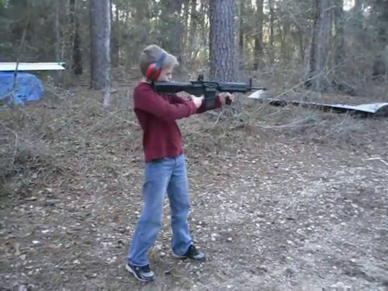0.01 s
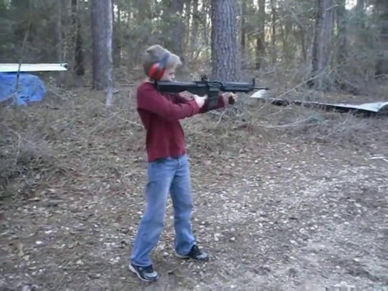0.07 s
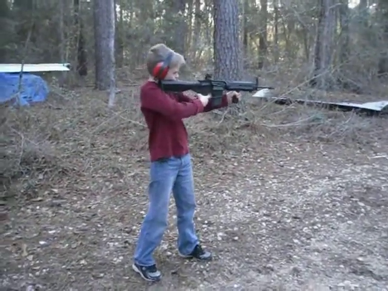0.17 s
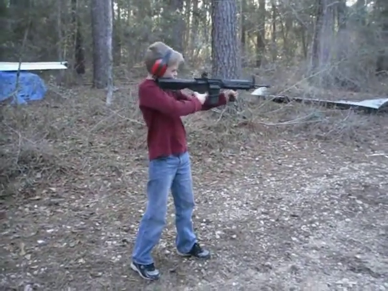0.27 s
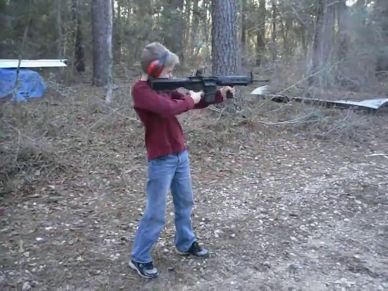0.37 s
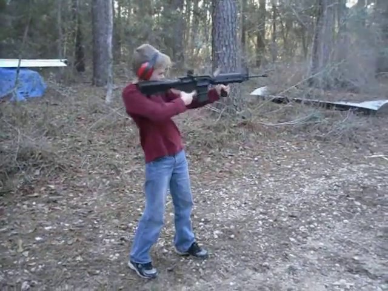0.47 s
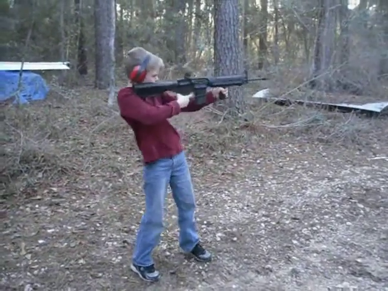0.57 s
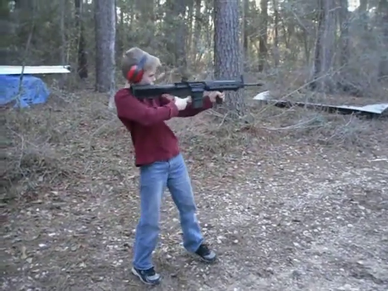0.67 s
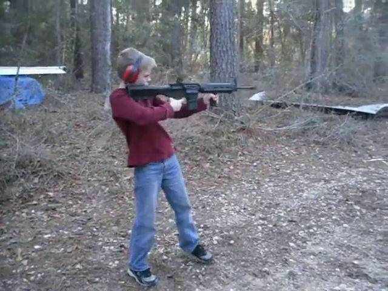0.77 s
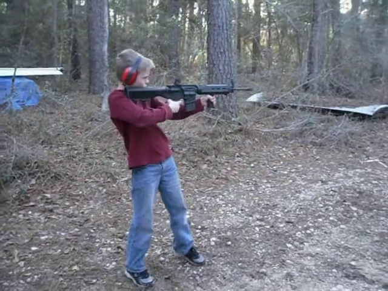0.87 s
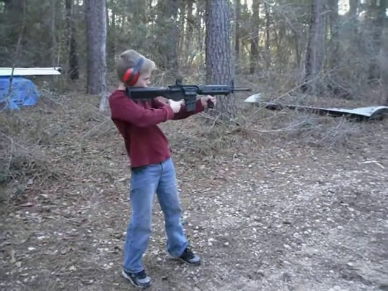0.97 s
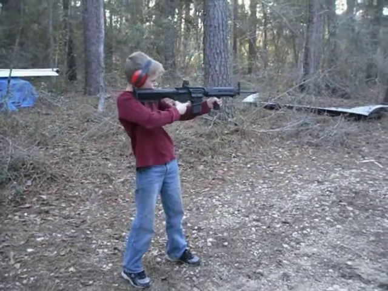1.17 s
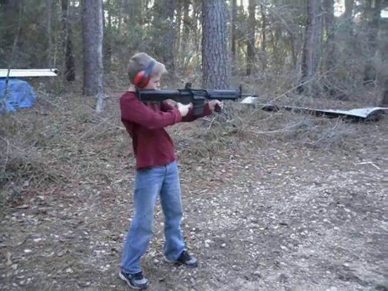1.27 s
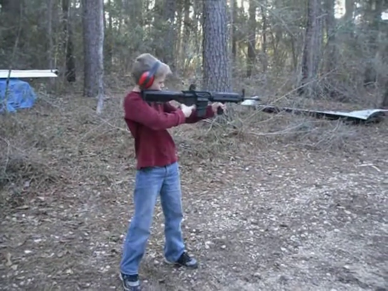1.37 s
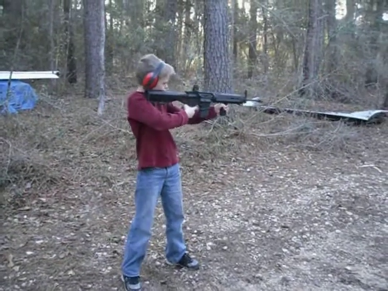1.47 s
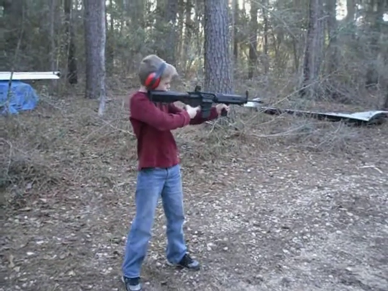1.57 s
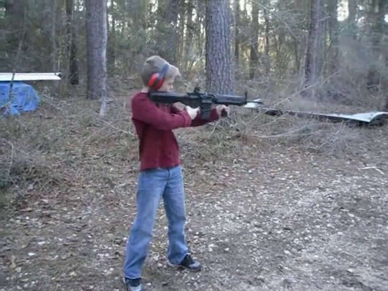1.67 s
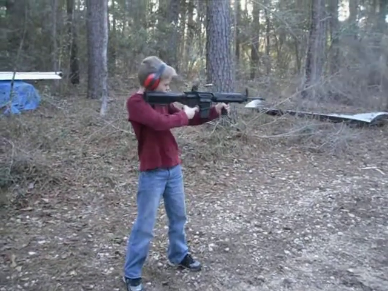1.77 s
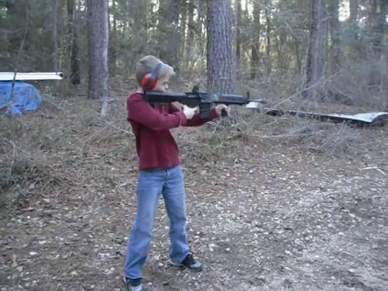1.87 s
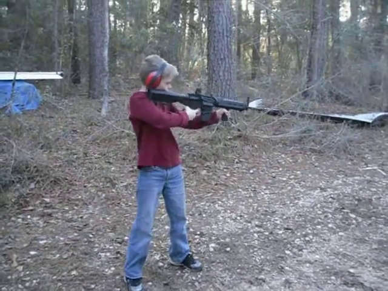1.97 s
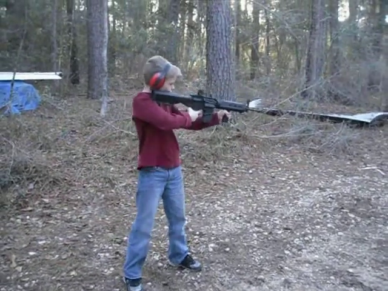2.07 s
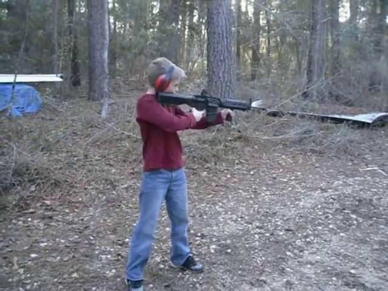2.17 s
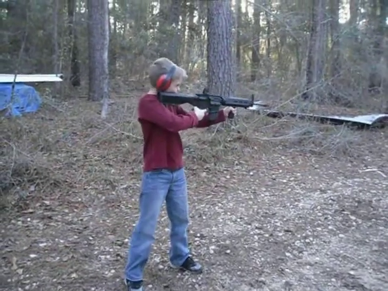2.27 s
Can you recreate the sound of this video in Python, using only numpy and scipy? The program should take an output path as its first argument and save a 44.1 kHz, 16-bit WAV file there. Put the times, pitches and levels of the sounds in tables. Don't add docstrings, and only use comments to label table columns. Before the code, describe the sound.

Rifle fires a rapid burst of three, then two, with rolling echoes through woods

```python
import sys
import numpy as np
from scipy import signal
from scipy.fft import rfft, irfft, next_fast_len
from scipy.io import wavfile
from scipy.ndimage import uniform_filter1d, map_coordinates

SR = 44100
rng = np.random.default_rng(int(sys.argv[2]) if len(sys.argv) > 2 else 0)


def gain_from_db(level_db):
    decades = np.asarray(level_db, float) / 20
    return 10 ** decades


def int16_out(signal):
    q = np.round(np.clip(np.atleast_2d(signal).T, -1, 1) * 32767)
    wavfile.write(sys.argv[1], SR, q.astype(np.int16))


N = 101430

# [t/s, level/dB]
SHOTS = [
    (0.2165, -1),
    (0.308, 1),
    (.3982, 0),
    (1.5995, -0.5),
    (1.6853, -3),
]
EARLIER_S, EARLIER_DB = -1.26, 10

# [f/Hz, density/dB per Hz]
NEAR_SPECTRUM = [(40, -30), (160, 3), (450, 3.5), (880, -0.5), (1250, -9), (3200, -13.5), (4200, -15.5),
                 (8000, -19)]
FAR_SPECTRUM = [(40, -51), (150, -23.5), (400, -7.5), (740, -1), (1100, -12), (1800, -12.5), (3400, -17),
                (7500, -29)]
GROUND_SPECTRUM = [(30, -40), (55, -0.5), (105, 5.5), (140, -8.5), (300, -61.5)]
# [f/Hz, T60/s]
NEAR_T60_S = [(60, 0.52), (200, 0.3), (700, 0.61), (2500, 0.64), (7000, 0.48)]
FAR_T60_S = [(60, 2.7), (200, 2.54), (700, 2.76), (1500, 2.29), (3200, 1.563), (4500, 1.16), (7000, 1.07)]
GROUND_T60_S = [(60, 0.81), (120, 1.29)]
NEAR_DB, FAR_DB, GROUND_DB = 10, -10.5, -25.5
NEAR_RISE_S, FAR_RISE_S, GROUND_RISE_S = 0.0061, 0.078, 0.2
# [rate/per s, depth/dB]
LUMPS = [(10, -0.5), (60, 1.27), (160, 2), (500, 1)]
LUMPY_BELOW_HZ, SMOOTH_SHARE = 1300, 0.23
PATCHY_DB = 1.0

# [f/Hz, density/dB per Hz]
AIR_SPECTRUM = [(25, -8), (60, 1), (110, -2), (150, -8), (350, -11), (1000, -14), (4000, -22.5),
                (8000, -28)]
AIR_DB = -53.5

# [t/s, level/dB]
CASES = [
    (0.127, -43),
    (1.0494, -49.5),
    (1.0919, -40),
    (1.2634, -39),
]
# [f/Hz, density/dB per Hz]
BRASS_SPECTRUM = [(1500, -32), (3000, -10), (5000, 5.5), (7000, 4), (9000, -22)]
CASE_T60_S, CASE_RISE_S, CASE_DB = 0.049, 0.00089, -9

HAMMER_LEAD_S, HAMMER_DB, HAMMER_T60_S = 0.0083, -32, 0.035
# [t after blast/s, level/dB]
BOLT = [
    (0.0126, 11.5),
    (.021, 11),
    (0.031, 3.5),
    (.048, 5),
    (.065, 0.5),
]
# [f/Hz, density/dB per Hz]
STEEL_SPECTRUM = [(1500, -31), (3000, 1.5), (4500, -13.5), (6800, 0), (9000, -6.5)]
BOLT_T60_S, BOLT_SCATTER_DB = 0.016, 2

PULSE_S, PULSE_LAG_S, PULSE_DB = 0.0016, 0.0016, 14
# [f/Hz, density/dB per Hz]
JET_SPECTRUM = [(300, -23.5), (1200, -6), (2200, -3), (2900, 0), (3800, -2), (6300, -4), (9000, -5)]
JET_DB, JET_RISE_S, JET_T60_S = 26, 0.0025, 0.022

# [t/s, level/dB]
RATTLE = [
    (.511, 5.5),
    (.545, -7),
    (1.74, -7.5),
]
# [f/Hz, density/dB per Hz]
FRAME_SPECTRUM = [(1800, -30.5), (2600, -5.5), (3100, 4.5), (3700, -17), (5000, -32)]
RATTLE_T60_S, RATTLE_RISE_S = 0.033, 0.002

# [t/s, level/dB]
BIG_TRUNKS = [
    (.535, 3.5),
    (.59, 3.5),
    (.601, -7),
    (.622, -8.5),
    (.65, -10.5),
    (1.82, -2.5),
    (1.843, -2),
    (1.925, -5),
    (2.003, -7),
]
BIG_HZ, BIG_T60_S, BIG_RISE_S = 724, 0.029, 0.0025

# [f/Hz, gain/dB]
CAPSULE = [(20, -26), (55, 0), (3500, -0.5), (4200, -5), (7300, 0), (8800, -13), (9500, -46.5)]
# [f/Hz, gain/dB]
ANTI_ALIAS = [(7200, -0.5), (8000, -6), (8900, -14), (9600, -19.5), (16000, -36.5)]
INPUT_TOP, INPUT_KNEE, OUTPUT_TOP, OUTPUT_KNEE = 0.82, 10, 0.73, 39
TOP_HZ, TOP_WIDTH_HZ, DC_OFFSET = 15950, 60, 0.0015


def unit(x):
    return x / np.sqrt(np.mean(x ** 2) + 1e-20)


def along(points, hz):
    f, v = np.transpose(points)
    return np.interp(np.log(hz + 1), np.log(f + 1), v)


def filtered(x, response):
    m = 2 * next_fast_len(len(x) // 2 + 4096)
    return irfft(rfft(x, m) * response(np.fft.rfftfreq(m, 1 / SR)), m)[:len(x)]


def noise(spectrum):
    white = rng.standard_normal(N)
    return unit(filtered(white, lambda hz: gain_from_db(along(spectrum, hz))))


def wobble(rate_per_s):
    knots = rng.standard_normal(3000)
    return map_coordinates(knots, [np.arange(N) * rate_per_s / SR])


def burst(start_s, db, t60_s, rise_s=0.0009):
    t = np.maximum(np.arange(N) / SR - start_s, 0)
    return gain_from_db(db - 60 * t / t60_s) * (1 - np.exp(-(t / rise_s) ** 3))


def lumpy_noise():
    lumps_db = sum(depth_db * wobble(rate) for rate, depth_db in LUMPS)
    white = rng.standard_normal(N)

    def low(hz):
        return 1 / (1 + (hz / LUMPY_BELOW_HZ) ** 4)

    deep = unit(white * gain_from_db(lumps_db))
    shallow = unit(white * gain_from_db(SMOOTH_SHARE * lumps_db))
    return filtered(deep, low) + filtered(shallow, lambda hz: 1 - low(hz))


def echoes(spectrum, t60s, db, rise_s):
    coloured = unit(filtered(lumpy_noise(), lambda hz: gain_from_db(along(spectrum, hz))))
    hz, t, z = signal.stft(coloured, SR, nperseg=512)
    patches = uniform_filter1d(rng.standard_normal(z.shape), size=5, axis=0)
    patches = uniform_filter1d(patches, size=4, axis=1)
    z = z * gain_from_db(PATCHY_DB * unit(patches))
    t60_s = along(t60s, hz)[:, None]
    out = np.zeros(N)
    for s, strength_db in [*SHOTS, (EARLIER_S, EARLIER_DB)]:
        decay = gain_from_db(-60 * np.maximum(t - s, 0) / t60_s)
        shifted = np.roll(z, rng.integers(z.shape[1]), axis=1)
        tail = signal.istft(shifted * decay, SR, nperseg=512)[1][:N]
        out += tail * burst(s, strength_db + db, np.inf, rise_s)
    return out


def wood_roll():
    near = echoes(NEAR_SPECTRUM, NEAR_T60_S, NEAR_DB, NEAR_RISE_S)
    far = echoes(FAR_SPECTRUM, FAR_T60_S, FAR_DB, FAR_RISE_S)
    ground = echoes(GROUND_SPECTRUM, GROUND_T60_S, GROUND_DB, GROUND_RISE_S)
    return near + far + ground


def still_air():
    return gain_from_db(AIR_DB) * noise(AIR_SPECTRUM)


def cases():
    shape = sum(burst(s, db + CASE_DB, CASE_T60_S, CASE_RISE_S) for s, db in CASES)
    return noise(BRASS_SPECTRUM) * shape


def action():
    shape = np.zeros(N)
    for s, shot_db in SHOTS:
        shape += burst(s - HAMMER_LEAD_S, HAMMER_DB, HAMMER_T60_S)
        for lag_s, db in BOLT:
            scatter_db = rng.normal(0, BOLT_SCATTER_DB)
            shape += burst(s + lag_s, shot_db + db + scatter_db, BOLT_T60_S)
    return noise(STEEL_SPECTRUM) * shape


def gas_jet():
    shape = sum(burst(s, db + JET_DB, JET_T60_S, JET_RISE_S) for s, db in SHOTS)
    return noise(JET_SPECTRUM) * shape


def muzzle_pulse():
    out = np.zeros(N)
    for s, db in SHOTS:
        u = np.maximum(np.arange(N) / SR - s - PULSE_LAG_S, 0) / PULSE_S
        wave = (u > 0) * (1 - u) * np.exp(-u)
        out += gain_from_db(db + PULSE_DB) * wave * np.minimum(u * 4, 1)
    return out


def rattle():
    shape = sum(burst(s, db, RATTLE_T60_S, RATTLE_RISE_S) for s, db in RATTLE)
    return noise(FRAME_SPECTRUM) * shape


def big_trunks():
    t = np.arange(N) / SR
    out = np.zeros(N)
    for s, db in BIG_TRUNKS:
        hz = BIG_HZ * rng.uniform(0.86, 1.15)
        ring = np.sin(2 * np.pi * hz * (t - s))
        out += ring * burst(s - BIG_RISE_S, db, BIG_T60_S, BIG_RISE_S)
    return out


def scene():
    wood = wood_roll() + big_trunks()
    rifle = action() + gas_jet() + muzzle_pulse() + rattle()
    return (wood + still_air() + cases() + rifle)[None]


def clip(x, top, knee):
    return x / (1 + np.abs(x / top) ** knee) ** (1 / knee)


def causal(points):
    def response(hz):
        cepstrum = irfft(np.log(gain_from_db(along(points, hz))))
        half = len(cepstrum) // 2
        cepstrum[1:half] *= 2
        cepstrum[half + 1:] = 0
        return np.exp(rfft(cepstrum))
    return response


def low_pass(x):
    return signal.sosfilt(signal.butter(12, 16630, fs=SR, output="sos"), x)


def record(dry):
    x = filtered(dry[0], causal(CAPSULE))
    x = clip(x, INPUT_TOP, INPUT_KNEE)
    x = filtered(x, causal(ANTI_ALIAS))
    x = clip(x, OUTPUT_TOP, OUTPUT_KNEE)
    x = filtered(x, lambda hz: (1 - np.tanh((hz - TOP_HZ) / TOP_WIDTH_HZ)) / 2)
    mix = x[None] + DC_OFFSET
    return low_pass(mix)


dry = scene()
out = record(dry)
int16_out(out)
```